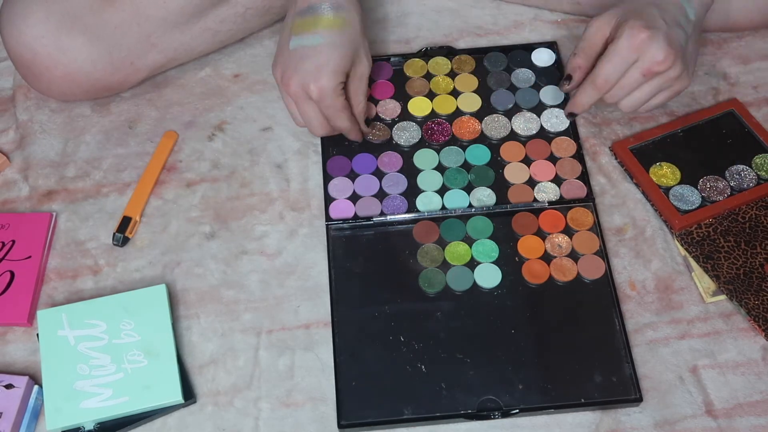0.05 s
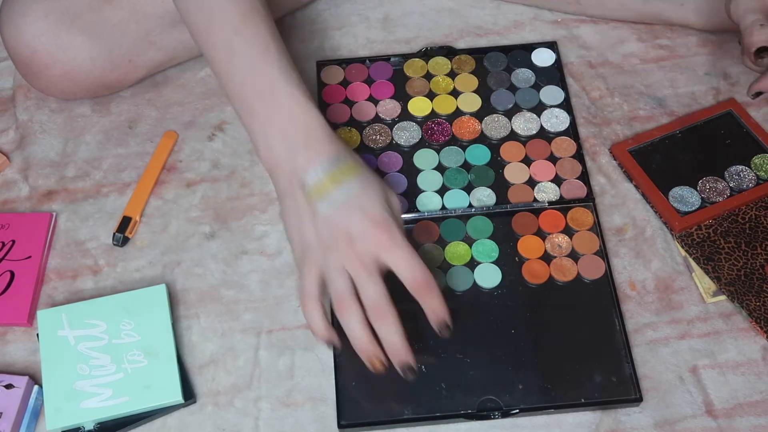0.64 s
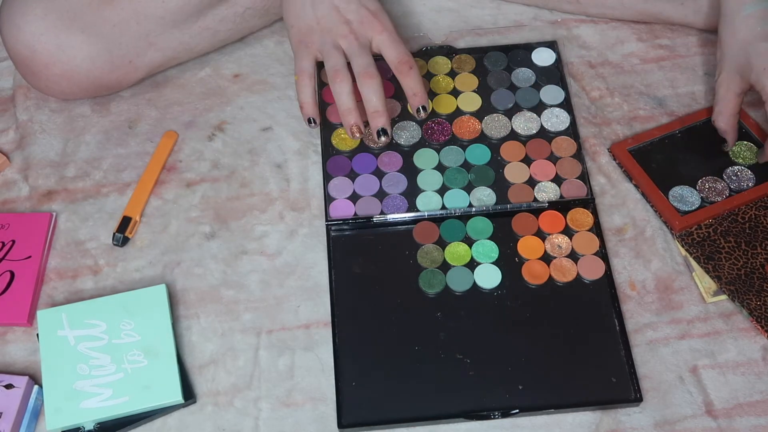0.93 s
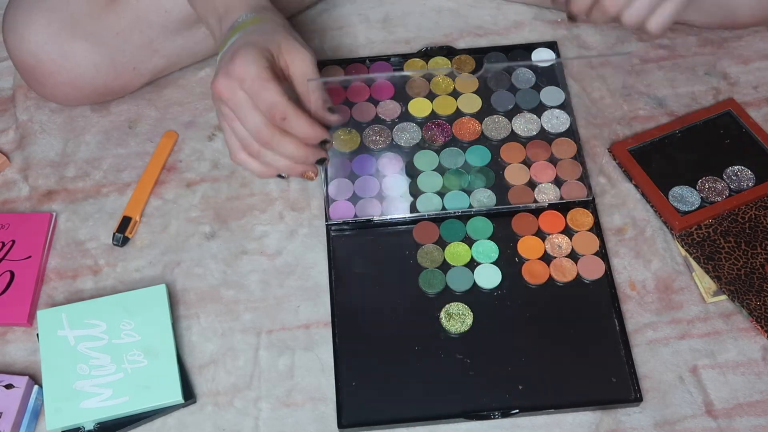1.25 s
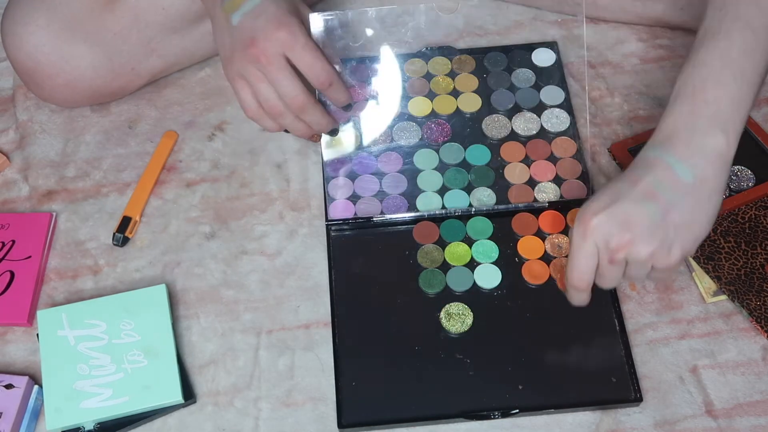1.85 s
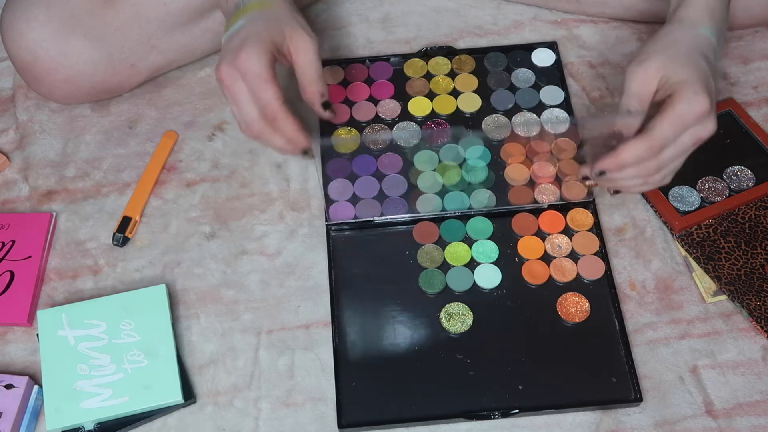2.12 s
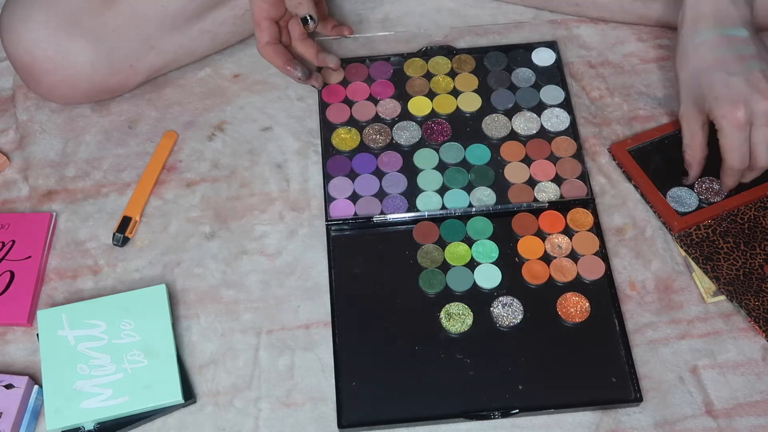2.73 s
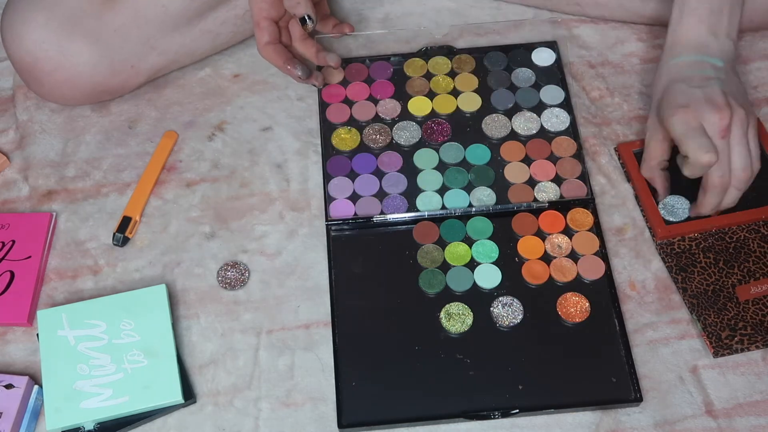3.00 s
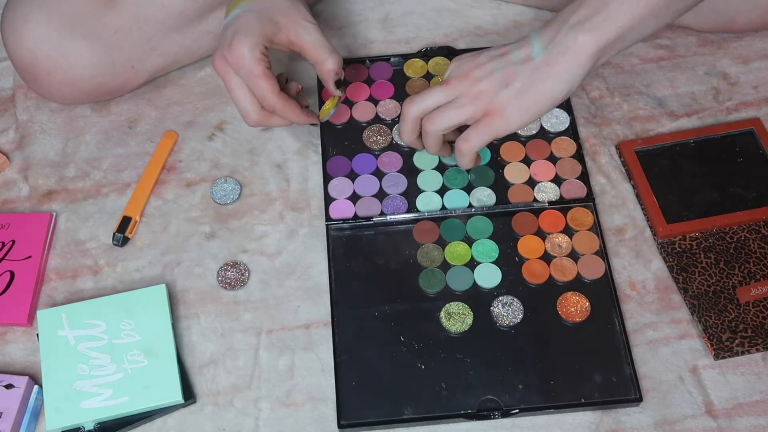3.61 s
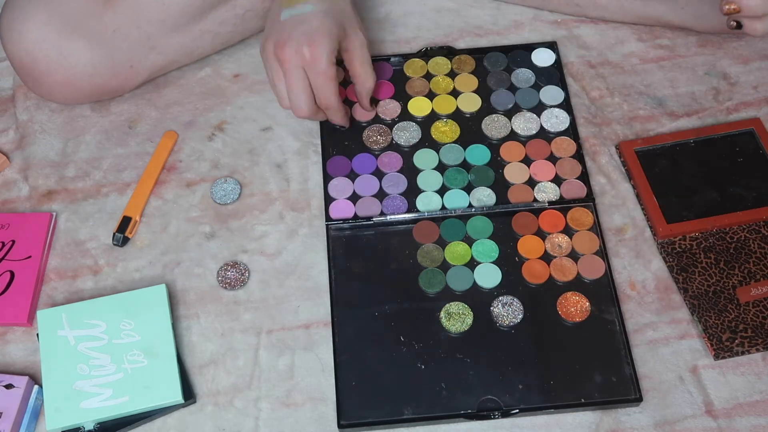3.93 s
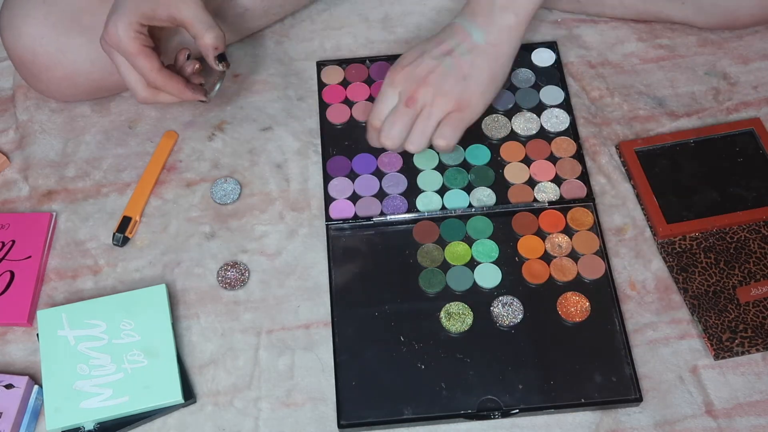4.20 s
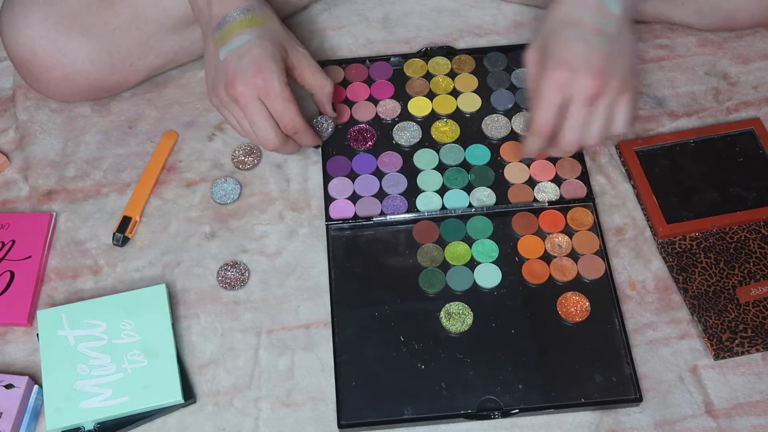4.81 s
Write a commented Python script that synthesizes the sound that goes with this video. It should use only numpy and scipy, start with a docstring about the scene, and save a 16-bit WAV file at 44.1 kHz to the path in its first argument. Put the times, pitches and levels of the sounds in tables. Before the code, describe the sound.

Close by in a quiet, softly furnished room, little metal pans snap onto a magnetic makeup palette at uneven intervals. The dry clicks are mixed with soft finger taps, small nudges and ticks of metal touching metal. The loudest click comes about halfway, with a brief ring, and a last firm snap comes near the end. Behind them are steady hiss, faint electrical hum and a faint far whine that climbs, then runs down.

```python
"""Small metal pans are lifted from a magnetic palette and set down by hand, close by in a furnished room.
From the start, over low room rumble, microphone hiss and a faint electrical hum, each landing pan
chatters for milliseconds as the magnet pulls it flat and damps it; ticks, nudges and fingertip taps fall
in between. After 1 s a far whine begins to climb. At 2.3 s one pan lands hard and rings on briefly.
The whine runs down and is gone by 3.7 s, and the last pan snaps flat at 4.7 s."""
import sys
import numpy as np
from scipy import signal
from scipy.fft import rfft, irfft
from scipy.io import wavfile

SR = 44100
rng = np.random.default_rng(int(sys.argv[2]) if len(sys.argv) > 2 else 0)


def pcm_store(signal):
    """Save signal as 16-bit PCM."""
    levels = np.round(np.clip(np.atleast_2d(signal), -1, 1) * 32767)
    wavfile.write(sys.argv[1], SR, levels.astype(np.int16).T)


N = 222922

# spectral density of the background noise: f/Hz, relative level/dB
NOISE_SPECTRUM = [(20, -20), (45, -27.5), (88, -20.5), (115, -8), (175, -6.5), (235, -11.5), (300, -4),
                  (380, -6), (490, -4), (700, -5), (950, -6.5), (3400, -8.5), (4700, -12.5), (16000, -18)]
# stereo width of the background noise: f/Hz, side minus mid/dB
NOISE_WIDTH = [(30, -16), (120, -35), (480, -36), (700, -13), (1000, -6), (1500, -1), (2500, 2), (14000, 2)]
# low resonances in the background noise: f/Hz, bandwidth/Hz, rms level/dB
NOISE_RESONANCES = [(126.4, 14, -76), (527.5, 128, -69)]
# electrical hum, harmonics of 200 Hz: f/Hz, rms level/dB
HUM_HARMONICS = [(200, -78), (400, -71.5), (800, -69.5), (1000, -80), (1400, -79.5), (1600, -81),
                 (1800, -78.5), (2200, -78.5), (2400, -84.5), (2600, -80), (3800, -82.5)]
# spectrum of the reverberation: f/Hz, relative level/dB
REVERB_SPECTRUM = [(300, -34), (1000, -12), (2500, 19), (6000, -2), (16000, 13)]
# normal modes of a free pan: f/Hz, relative level/dB, T60/s
FREE_PAN_MODES = [(2325, -22, .045), (3232, -11, .034), (3689, -9, .035), (4020, -12, .03),
                  (4390, -10, .02), (4980, -13, .03), (5710, -8, .018), (6432, -7, .072), (7300, -6, .032),
                  (7835, -11, .04), (9000, -10, .025), (11770, -14, .05), (12600, -3, .016),
                  (15350, -12, .018)]
# normal modes of the palette's board: f/Hz, relative level/dB, T60/s
PALETTE_MODES = [(462, -17, 0.033), (611, 0.5, 0.035), (804, -1.5, 0.014), (1186, -8, 0.019),
                 (1337, 5.5, 0.021), (1580, 2, 0.017)]
# limits of a contact's four bands, called body, rim, main (5-9 kHz) and edge: f/Hz
BAND_LIMITS = [1000, 2500, 5000, 9000, 16500]
# a dip near 5 kHz that softens quick clicks: lower f/Hz, upper f/Hz
CLICK_DIP = (4500, 5300)
# a fingertip knocks on the palette: t/s, body level/dB
FINGER_TAPS = [(1.5203, -56), (2.475, -64), (2.708, -57), (3.3557, -57), (3.4156, -52), (3.671, -59.5),
               (4.0059, -53.5)]
# a pan is pushed along the sheet: t/s, main level of the middle slip/dB, main f/Hz
PAN_NUDGES = [(0.6938, -49, 6200), (0.874, -62, 10500), (3.222, -59, 5200), (4.382, -51, 6340),
              (4.457, -55.5, 7960)]
# a pan touches a neighbour or rebounds: t/s, main level/dB, chatter time/s
PAN_TICKS = [(0.4893, -56, 0.00026), (1.1135, -56, 0.00049), (1.9132, -63.5, 0.00055),
             (2.3554, -45, 0.00088), (3.1558, -53, 0.0037), (3.2753, -48, 0.0006), (3.8364, -63.5, .0008),
             (3.8827, -51, 0.00069), (4.3281, -51, 0.00041), (4.776, -63, 0.00033)]
# a pan snaps onto the magnet:
# t/s, main level/dB, body re main/dB, rim re main/dB, main f/Hz, hollow f/Hz, chatter time/s
PAN_LANDINGS = [(0.107, -39, -8, -4.5, 6270, 2800, 0.00044), (0.5799, -37, -15.5, -8, 6960, 2820, 0.001),
                (0.9016, -41, -34, -8, 8600, 3830, 0.0014), (1.1348, -50.5, -3, -2.5, 6100, 1890, 0.00068),
                (2.3416, -26.5, -10, -1.5, 7240, 4470, 0.0032),
                (2.656, -37.5, -13.5, -7, 5160, 1620, .0016),
                (3.2582, -34.5, -13.5, -12, 7600, 1190, 0.00363),
                (4.6883, -29, -17, -12, 6780, 1090, 0.0038)]

SLOW_LANDING_S = .003   # chatter time from which a landing counts as slow


def from_db(db):
    """Amplitude ratio: a factor of ten for every 20 dB."""
    return 10 ** (np.asarray(db) / 20)


def unit_rms(x):
    """Normalisation to unit mean power."""
    return x / np.sqrt(np.mean(x ** 2) + 1e-30)


def at_level(x, db):
    """Normalisation of a transient to the given rms level over its first 10 ms."""
    return from_db(db) * x / np.sqrt(np.mean(x[:SR // 100] ** 2) + 1e-30)


def level_at(spectrum, hz):
    """Interpolation of a spectrum on a logarithmic frequency axis."""
    points = np.array(spectrum)
    return np.interp(np.log(np.maximum(hz, 1)), np.log(points[:, 0]), points[:, 1])


def coloured_noise(shape, db_at):
    """Spectral shaping: white noise is weighted by db_at(f/Hz)."""
    white = rng.standard_normal(shape)
    size = white.shape[-1]
    return irfft(rfft(white) * from_db(db_at(np.fft.rfftfreq(size, 1 / SR))), size)


def band(x, low_hz, high_hz, order):
    """Causal band-pass filtering."""
    return signal.sosfilt(signal.butter(order, [low_hz, high_hz], "band", fs=SR, output="sos"), x)


def resonator(force, hz, t60):
    """Damped harmonic oscillator: its impulse response is a decaying cosine of height 1."""
    r, w = from_db(-60 / (t60 * SR)), 2 * np.pi * hz / SR
    return signal.lfilter([1, -r * np.cos(w)], [1, -2 * r * np.cos(w), r * r], force + 1e-18)


def background_noise(mid_db=-60.5):
    """Stationary noise: coherent low room rumble in the centre, wide microphone hiss above 1 kHz."""
    mid = coloured_noise(N, lambda hz: level_at(NOISE_SPECTRUM, hz))
    side = coloured_noise(N, lambda hz: level_at(NOISE_SPECTRUM, hz) + level_at(NOISE_WIDTH, hz))
    out = from_db(mid_db) * (mid + side * [[1], [-1]]) / np.std(mid)
    for hz, width_hz, db in NOISE_RESONANCES:
        drone = band(rng.standard_normal(N), hz - width_hz / 2, hz + width_hz / 2, order=2)
        out += from_db(db) * unit_rms(drone)
    return out


def electrical_hum(waver=.11):
    """A harmonic series, each partial under slow random amplitude modulation."""
    t, out = np.arange(N) / SR, 0
    for hz, db in HUM_HARMONICS:
        drift = unit_rms(coloured_noise(N, lambda f: -40 * np.log10(1 + f / 4)))
        partial = np.sqrt(2) * np.sin(2 * np.pi * (hz * t + rng.random()))
        out += from_db(db) * (1 + waver * drift) * partial
    return out


def far_whine(start_s=1.15, top_s=3.02, end_s=3.69, fade_s=.28, top_hz=572, db=-69.5):
    """A gliding pure tone: its phase is the integral of a frequency that climbs, then runs down."""
    t = np.arange(N) / SR
    hz = top_hz - np.maximum(12 * (top_s - t), 160 * (t - top_s))   # slopes in Hz/s
    swell = np.clip(np.minimum(t - start_s, end_s - t) / fade_s, 0, 1)
    return np.sqrt(2) * from_db(db) * swell * np.sin(2 * np.pi * np.cumsum(hz) / SR)


def reverberation(x, wet_db=-21, t60=.063, first_echo_s=.0036):
    """Absorption by soft furnishings leaves a short, weak exponential tail, different on each side."""
    t = np.arange(SR // 4) / SR
    tail = coloured_noise((2, len(t)), lambda hz: level_at(REVERB_SPECTRUM, hz))
    tail *= from_db(-60 * t / t60) * (t > first_echo_s)
    tail /= np.sqrt(np.sum(tail ** 2) / 2)
    return from_db(wet_db) * signal.fftconvolve(x[None], tail, axes=1)[:, :N]


def chatter(chatter_s, slowness, freedom, touches_per_s=3000, grit=.1):
    """Repeated impact: the force as a pan's rim touches, snaps flat and settles in weakening touches."""
    size = SR // 8
    t = np.arange(size) / SR
    touches = (rng.random(size) < touches_per_s / SR) * rng.choice([-1, 1], size)
    touches = touches * rng.uniform(.3, .8, size)
    envelope = np.exp(-t / chatter_s) * (1 - np.exp(-t / (.2 * chatter_s)))
    force = (touches + grit * rng.standard_normal(size)) * envelope
    buzz_s = .0035 + .012 * freedom   # a loose pan buzzes longer against the sheet
    force += from_db(-33) * rng.standard_normal(size) * np.exp(-t / buzz_s)
    # a slow landing starts with a light touch and snaps flat a moment later
    force[0] += .45 * (1 - .7 * slowness)
    snap = signal.unit_impulse(size, round(.3 * chatter_s * SR))
    return force + slowness * (.3 + .8 * freedom) * snap, snap


def board_vibration(force, blow_db, heavy_db=-38):
    """Forced vibration: a heavy blow bends the board and favours its lowest modes."""
    tilt_db_per_octave = .38 * np.clip(blow_db - heavy_db, -3, 5)
    modes = sum(from_db(db + tilt_db_per_octave * np.log2(1000 / hz)) * resonator(force, hz, t60)
                for hz, db, t60 in PALETTE_MODES)
    return band(modes, 400, 2400, order=2)


def pan_vibration(force, snap, freedom, main_hz, hollow_hz, hollow_gain):
    """Modal superposition: the magnet's damping shortens the free modes as freedom falls from 1 to 0."""
    strike = (1 - freedom) * force + freedom * 2.26 * snap   # the snap is what rings a loose pan
    modes = sum(from_db(db) * resonator(strike, hz, t60 * freedom) for hz, db, t60 in FREE_PAN_MODES)
    # pressed against the sheet, a pan keeps a main resonance and a hollow pair below it
    main = resonator(force, main_hz, t60=.0059)
    hollow = resonator(force, hollow_hz, t60=.01) + resonator(force, 1.24 * hollow_hz, t60=.01)
    return force + .23 * main + hollow_gain * hollow + from_db(-18) * modes


def contact(main_db, body_db, rim_db, edge_db, main_hz, hollow_hz, chatter_s,
            freedom=.2, hollow_gain=.11):
    """Impact excitation: one force drives pan and board. Body, rim and edge are relative to main_db."""
    slowness = min(chatter_s / SLOW_LANDING_S, 1)
    force, snap = chatter(chatter_s, slowness, freedom)
    pan = pan_vibration(force, snap, freedom, main_hz, hollow_hz, hollow_gain)
    pan -= (1 - slowness) * band(pan, *CLICK_DIP, order=1)   # softens quick clicks near 5 kHz
    levels_db = main_db + np.array([body_db, rim_db, 0, edge_db])
    click = sum(at_level(band(pan, low, high, order=3), db)
                for low, high, db in zip(BAND_LIMITS, BAND_LIMITS[1:], levels_db))
    blow_db = main_db + body_db
    board = at_level(board_vibration(force, blow_db), blow_db - 1)
    return click + slowness * board   # a slowly settling pan pushes the board harder


def edge_level(chatter_s, quick_s=.0005):
    """Longer contact gives a duller spectrum: the edge band loses 1.5 dB per doubling of chatter time."""
    return -1.5 - 1.5 * np.log2(chatter_s / quick_s)


def finger_taps():
    """Soft impact: a fingertip gives a dull tap, strongest at 1-2.5 kHz, without the hollow pair."""
    for s, db in FINGER_TAPS:
        yield s, contact(db - 15, body_db=15, rim_db=9, edge_db=4,
                         main_hz=5040, hollow_hz=1470, chatter_s=.0007, hollow_gain=0)


def pan_nudges(gap_s=.02, unevenness=.25, outer_loss_db=8.5):
    """Stick-slip friction: a pushed pan slips three times, most strongly in the middle."""
    for s, db, main_hz in PAN_NUDGES:
        for slip in (-1, 0, 1):
            offset_s = slip * gap_s * (1 + unevenness * rng.uniform(-.89, 1))
            yield s + offset_s, contact(db - abs(slip) * outer_loss_db, body_db=-11.5, rim_db=-9,
                                        edge_db=-8, main_hz=main_hz, hollow_hz=1420, chatter_s=.00406)


def pan_ticks(pitch_spread=.14):
    """Light impacts of metal on metal, each exciting resonances of slightly different pitch."""
    detunings = np.exp(pitch_spread * rng.standard_normal((len(PAN_TICKS), 2)))
    for (s, db, chatter_s), (main, hollow) in zip(PAN_TICKS, detunings):
        yield s, contact(db, body_db=-7, rim_db=-5, edge_db=edge_level(chatter_s),
                         main_hz=6660 * main, hollow_hz=1660 * hollow, chatter_s=chatter_s)


def pan_landings(held_freedom=.073, loose_db=-37.5, steepness=2.5):
    """Contact damping: the magnet pulls each pan flat; only a heavy blow leaves one free to ring."""
    for s, db, body_db, rim_db, main_hz, hollow_hz, chatter_s in PAN_LANDINGS:
        freedom = min(held_freedom + from_db(steepness * (db + body_db - loose_db)), 1)
        yield s, contact(db, body_db, rim_db, edge_level(chatter_s), main_hz, hollow_hz, chatter_s,
                         freedom)


def scene():
    """Superposition: direct sound from straight ahead, its reverberation and the background."""
    direct = np.zeros(N + SR)
    for s, hit in (*pan_landings(), *pan_ticks(), *finger_taps(), *pan_nudges()):
        start = round(s * SR)
        direct[start:start + len(hit)] += hit
    direct = direct[:N]
    return direct + reverberation(direct) + background_noise() + electrical_hum() + far_whine()


def record(dry, asymmetry=.015, cutoff_hz=16000):
    """Quadratic distortion: the microphone answers peaks a little unevenly; a steep low-pass follows."""
    low_pass = signal.ellip(8, .1, 70, cutoff_hz, fs=SR, output="sos")
    return signal.sosfilt(low_pass, dry + asymmetry * dry ** 2)


dry = scene()
out = record(dry)
pcm_store(out)
```